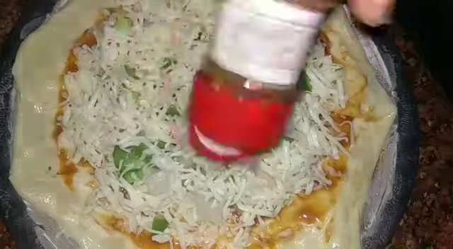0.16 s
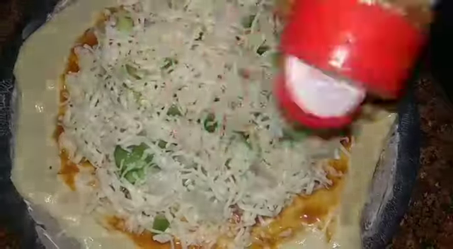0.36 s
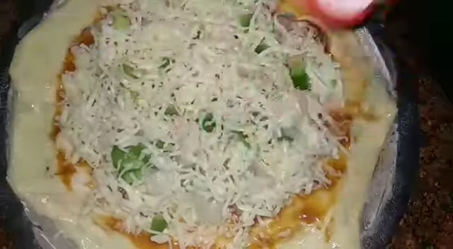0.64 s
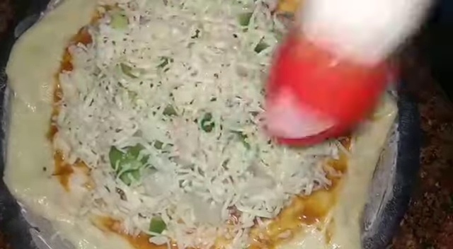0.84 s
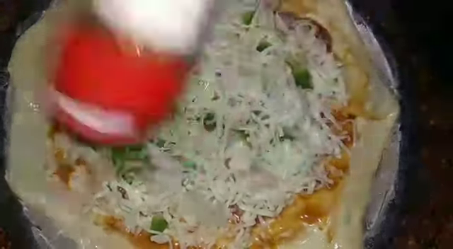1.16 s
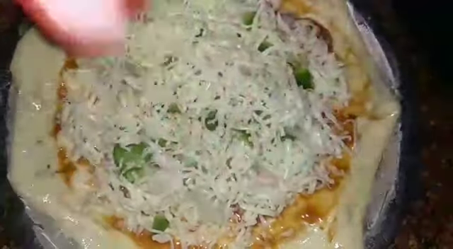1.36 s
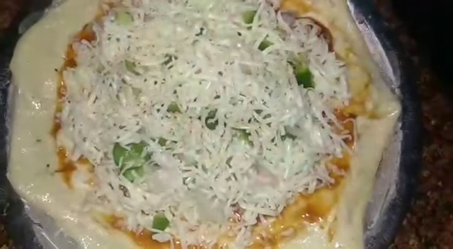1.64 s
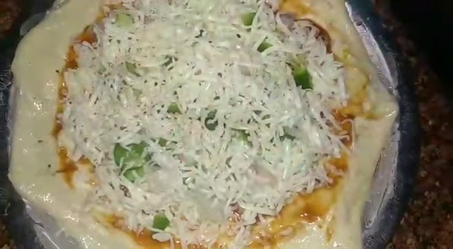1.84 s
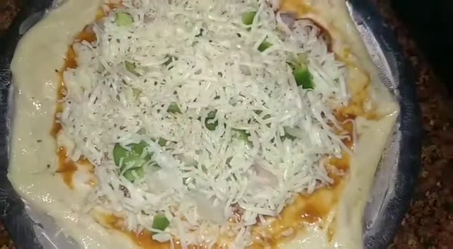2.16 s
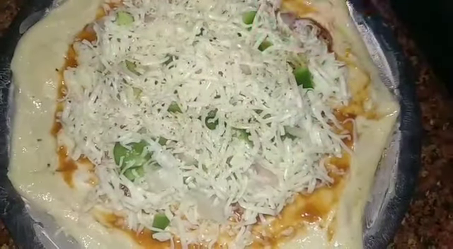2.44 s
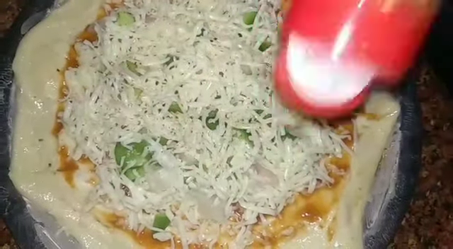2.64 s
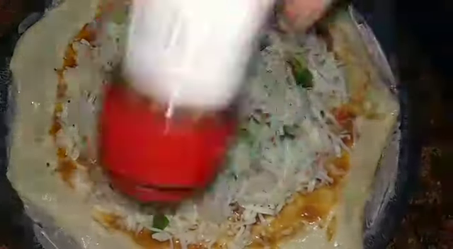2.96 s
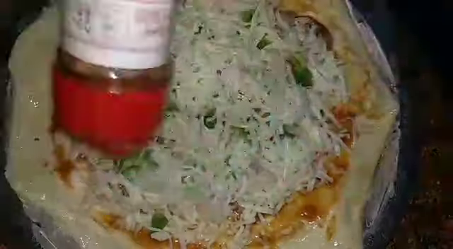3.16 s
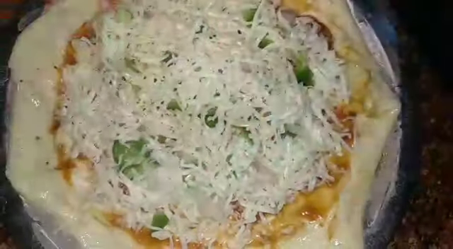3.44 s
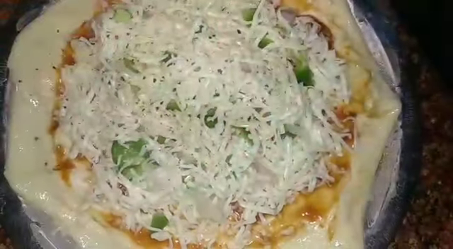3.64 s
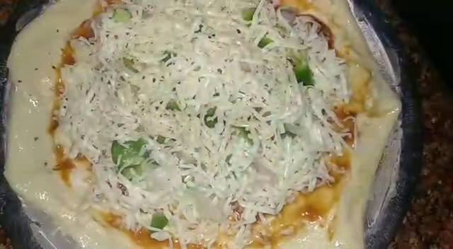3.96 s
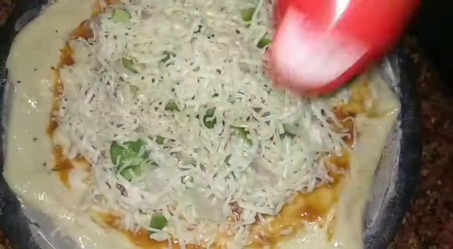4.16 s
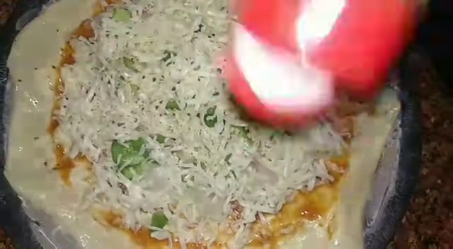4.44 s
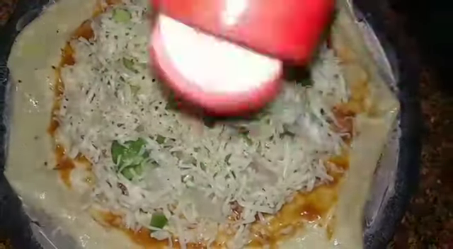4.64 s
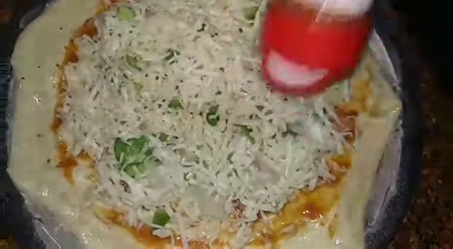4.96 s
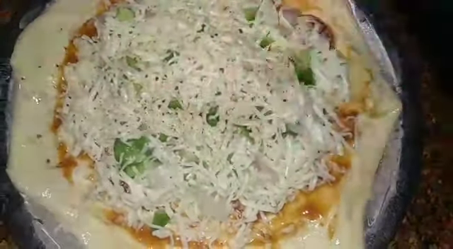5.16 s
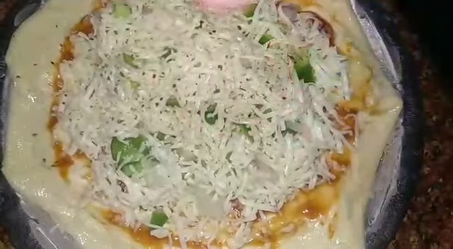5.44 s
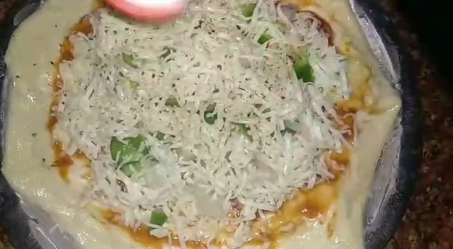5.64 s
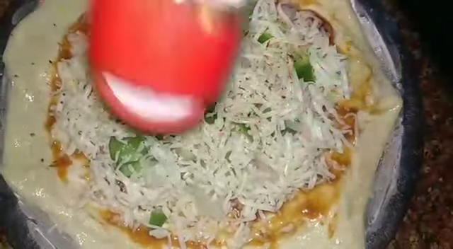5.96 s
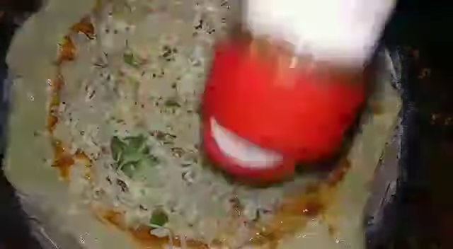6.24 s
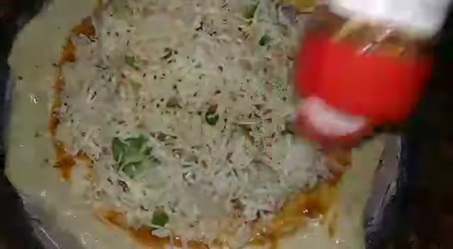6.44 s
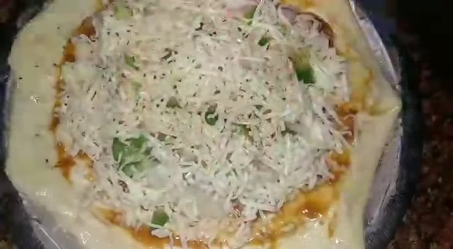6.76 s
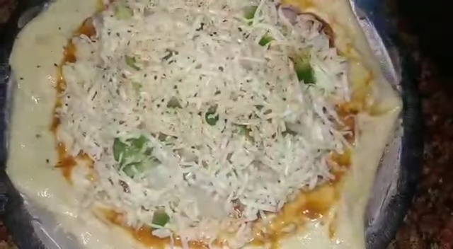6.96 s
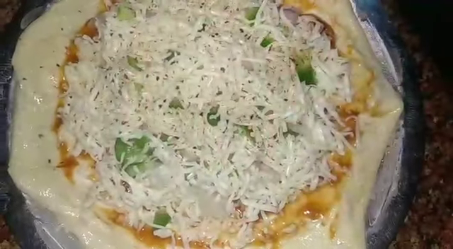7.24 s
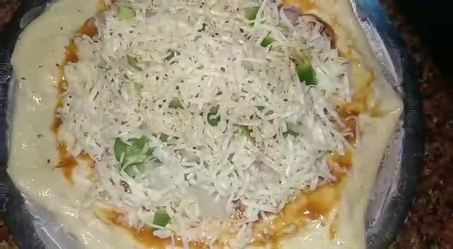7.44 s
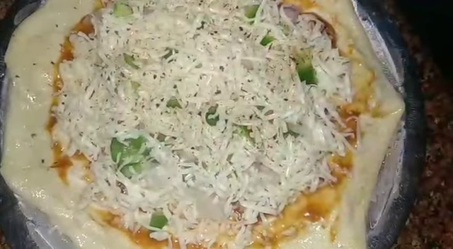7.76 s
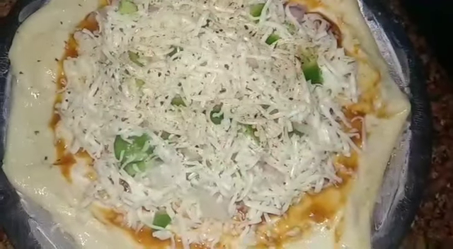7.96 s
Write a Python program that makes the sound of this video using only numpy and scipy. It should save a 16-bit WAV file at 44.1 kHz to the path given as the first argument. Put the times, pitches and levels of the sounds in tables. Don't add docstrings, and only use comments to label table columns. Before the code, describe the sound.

Dry flakes rattle in a small plastic jar shaken rapidly over food, with sharp seed cracks and slaps in a small hard kitchen.

```python
import sys
import numpy as np
from scipy import signal
from scipy.fft import rfft, irfft, next_fast_len
from scipy.io import wavfile
from scipy.ndimage import uniform_filter1d

SR = 44100
rng = np.random.default_rng(int(sys.argv[2]) if len(sys.argv) > 2 else 0)


def inscribe(sig):
    pcm = np.round(np.clip(np.atleast_2d(sig).T, -1, 1) * 32767)
    wavfile.write(sys.argv[1], SR, pcm.astype(np.int16))


def gain_from_db(level_db):
    decades = np.asarray(level_db, float) / 20
    return 10 ** decades


N = 357077


def rms_one(x):
    return x / np.sqrt(np.mean(x ** 2) + 1e-20)


def at_hz(points, hz):
    points = np.array(points)
    return np.interp(np.log(hz), np.log(points[:, 0]), points[:, 1])


def in_time(s, values):
    return np.interp(np.arange(N) / SR, s, values)


def colour(x, gains_db):
    size = next_fast_len(N + 4096)
    hz = np.maximum(np.arange(size // 2 + 1) * SR / size, 10)
    return irfft(rfft(x, size) * gain_from_db(gains_db(hz)), size)[..., :N]


def drift(rate_hz):
    r = np.exp(-2 * np.pi * rate_hz / SR)
    noise = rng.standard_normal(N + SR)
    return rms_one(signal.lfilter([1], [1, -2 * r, r * r], noise)[SR:])


def held_gains(count, spread_db):
    gains = gain_from_db(rng.normal(0, spread_db, (count, 2, N // 1024 + 1)))
    return np.repeat(gains, 1024, axis=2)[..., :N]


def left_right(difference_db):
    return np.outer([.5, -.5], difference_db)


def butter(x, order, hz, kind):
    return signal.sosfilt(signal.butter(order, hz, kind, fs=SR, output="sos"), x)


def resonance(x, hz, width_hz):
    r = np.exp(-np.pi * width_hz / SR)
    poles = [1, -2 * r * np.cos(2 * np.pi * hz / SR), r * r]
    return signal.lfilter([(1 - r * r) / 2, 0, (r * r - 1) / 2], poles, x)


def ring(clicks, hz, t60_s):
    r, w = gain_from_db(-60 / (t60_s * SR)), 2 * np.pi * hz / SR
    return signal.lfilter([0, np.sin(w)], [1, -2 * r * np.cos(w), r * r], clicks + 1e-18)


def landings():
    # start_s, lid_peak_db, base_delay_ms,
    # base_peak_db, spread_ms_per_10db
    jar_shakes = [(0.007, -28, 40, -27.5, 34), (0.126, -28, 50, -23.5, 16.5), (0.265, -30.5, 48, -21, 33.5),
                  (0.409, -22.5, 45, -22.5, 23.5), (0.55, -26, 36, -25.5, 35),
                  (0.683, -26.5, 47, -22, 24.5), (0.833, -25.5, 35, -21.5, 20.5),
                  (0.979, -19.5, 45, -22.5, 22.5), (1.264, -24.5, 31, -28.5, 36), (1.381, -23, 37, -21, 29),
                  (1.515, -16.5, 45, -19.5, 18.5), (1.67, -17.5, 42, -17, 15),
                  (1.815, -16, 48, -18.5, 14.5), (1.969, -18.5, 38.7, -17, 21.5),
                  (2.104, -22, 38.6, -22, 17),
                  (2.371, -16.5, 32, -18, 19.5), (2.643, -13.5, 47, -16.5, 14),
                   (2.903, -13, 38, -15, 13.5), (3.103, -17, 40, -26, 16.5), (3.268, -16.5, 43, -17, 14),
                   (3.445, -15.5, 46, -15.5, 11.5), (3.605, -14, 50, -23, 13.5),
                   (3.783, -16, 51, -17, 15.5), (3.964, -18, 62.4, -15.5, 18),
                   (4.138, -16.5, 54, -20.5, 19.5), (4.302, -16.5, 52, -16, 14.5),
                   (4.477, -19.5, 36, -18, 16), (4.655, -21, 35, -17, 22.5), (4.809, -25, 43.5, -20.5, 23),
                  (5.04, -22, 45, -23, 34), (5.203, -29, 36, -26.5, 29.5), (5.357, -25.5, 44.5, -21.5, 33),
                  (5.548, -25.5, 68.6, -20.5, 34), (5.707, -35, 40, -35.5, 20), (5.91, -26.5, 42, -21, 36),
                  (6.07, -24.5, 47, -24, 26.5), (6.262, -33.5, 53, -24, 25.5), (6.44, -38, 51, -27.5, 44),
                  (6.62, -33.5, 44, -30.5, 38), (6.818, -26, 28, -20, 26.5), (6.972, -26, 36, -25, 50),
                  (7.113, -27.5, 34, -22, 23), (7.253, -20, 50, -19.5, 19), (7.443, -31.5, 47, -28, 40),
                  (7.532, -26.5, 91, -34.5, 29.5), (7.683, -34, 42, -37, 52.5)]
    # start_s, peak_db, spread_ms_per_10db
    slides = [(0.94, -33.5, 25), (1.04, -26.5, 6), (1.124, -33.5, 33), (1.23, -32, 12), (1.33, -32, 7),
              (1.59, -32.5, 30), (1.745, -32, 30), (1.9, -35, 30), (2.045, -33, 25), (6.235, -35, 17),
              (6.35, -39, 20), (7.82, -47.5, 59.5), (4.157, -21, 11.5), (2.44, -63.5, 34),
              (2.806, -39.5, 28), (3.22, -38.5, 22), (3.415, -28.5, 29), (3.514, -24, 3), (4.767, -29, 0),
              (4.935, -28.5, 18), (5.006, -26, 6), (5.07, -25, 26.5), (5.162, -37, 1), (5.281, -34, 16),
              (5.772, -40, 1), (5.822, -27, 9), (6.772, -31, -35), (7.215, -37, 24), (7.405, -35, 40),
              (7.574, -35, 40), (7.75, -41.5, 54), (8.03, -60, 37), (8.09, -46, 20)]
    # start_s, peak_db, scatter_ms_per_10db
    slaps = [(0.1494, -17.5, 8), (0.7283, -16, 4), (0.8713, -8.5, 10), (1.0104, -17, 13.5), (1.509, -12, 7),
             (1.5507, -9, 1), (1.662, -19, 7), (1.806, -11, 12), (1.8517, -9.5, 9.5), (2.1033, -13, 11),
             (2.6364, -11.5, 14), (2.687, -7, 7), (3.0953, -10, -1), (3.14, -4, 12.5), (3.3119, -9, 18),
             (3.486, -8, 5.5), (3.599, -11, -2), (3.6566, -9.5, 6), (3.8333, -5, 3.5), (3.958, -17, 7),
             (4.0182, -9.5, 9), (4.1105, -12.5, 9.5), (4.187, -4, 11), (4.4615, -13.5, 7),
             (4.635, -11.5, 9), (4.679, -21, 6), (5.344, -8.5, 24), (5.787, -19.5, 13), (5.8182, -16, 9),
             (6.2976, -23, 6), (6.4363, -19, 17), (6.8014, -15, -1), (7.137, -13, 8), (7.207, -21, 7),
             (7.4774, -18, 5)]
    on_lid, on_base, in_slide, in_slap = (1.21, 0.8, -15), (0.85, 0.81, -16), (0.54, 0.84, -14), (0, 1, -16)
    shakes = jar_shakes
    hits = [(s, db, ms, on_lid) for s, db, _, _, ms in shakes]
    hits += [(s + delay_ms / 1000, db, ms, on_base) for s, _, delay_ms, db, ms in shakes]
    hits += [(s, db, ms, in_slide) for s, db, ms in slides]
    hits += [(s, db - 8.5, ms, in_slap) for s, db, ms in slaps]
    return sorted((s, db, gather * ms, settle * ms, wall_db)
                  for s, db, ms, (gather, settle, wall_db) in hits)


def swarm_strength(roundness):
    power, t_ms = np.full(N, 1e-9), np.arange(N) / SR * 1000
    for s, peak_db, gather_ms, settle_ms, _ in landings():
        near = slice(max(int((s - .25) * SR), 0), int((s + .25) * SR))
        late_ms = t_ms[near] - s * 1000
        gathering, settling = -late_ms / max(gather_ms, 2.6), late_ms / max(settle_ms, 2)
        steps = np.where(late_ms < 0, gathering, settling)
        power[near] += gain_from_db(peak_db - 1.5 - 10 * steps ** roundness) ** 2
    return np.sqrt(power)


def flakes(quiet_per_s, extra_per_s, spread_db, cycles, wall_db):
    # time_s, left_right_db
    sweep = [
        (0.0, -4),
        (0.99, -1),
        (1.1, -5),
        (2.55, -0.5),
        (3.25, -4.5),
        (4.28, 0.5),
        (4.58, -2),
        (7.47, -4.5),
        (8.1, 3),
    ]
    # freq_hz, level_db_per_hz
    flake_spectrum = [(1760, -106), (3000, -13.5), (3860, -7), (5520, -3.5), (6860, -3.5), (10400, 0),
                      (12200, -2), (14000, -6), (15200, -11), (15750, -20), (16500, -51)]
    # freq_hz, left_right_db
    flake_sides = [(60, -1.0), (180, -0.5), (550, 25), (1650, -5.5), (4970, -3.5), (15000, -12.5)]
    # freq_hz, width_hz, level_db
    wall_modes = [(1205, 317, -6.5), (2095, 333, -4), (2323, 130, -0.5), (2687, 255, 1), (3068, 255, -1.5),
                  (3360, 173, -1.5)]
    s, _, _, _, share_db = np.transpose(landings())
    strength = swarm_strength(roundness=1.146)
    density_per_s = quiet_per_s + extra_per_s * strength / strength.max()
    per_s = density_per_s * gain_from_db(1.8 * drift(90))
    sizes = gain_from_db(spread_db * np.minimum(rng.exponential(1, N), 5.5)) * (rng.random(N) < per_s / SR)
    sizes = rms_one(sizes / np.sqrt(density_per_s))
    hits = sizes * rng.choice([-1, 1], (2, N)) * gain_from_db(rng.normal(0, 0.77, (2, N)))

    pitches_hz, dealt = np.geomspace(3200, 15500, 12), rng.integers(0, 12, (2, N))
    patch = held_gains(12, spread_db=2.27)
    tick_sound = sum(ring(hits * patch[k] * (dealt == k), hz, cycles / hz) * hz
                     for k, hz in enumerate(pitches_hz))
    flat_hz, flat_power = signal.welch(tick_sound, SR, nperseg=128)
    even = np.transpose([flat_hz[1:], -10 * np.log10(flat_power.mean(axis=0)[1:])])
    tick_sound = rms_one(colour(tick_sound, lambda hz: at_hz(flake_spectrum, hz) + at_hz(even, hz)))

    grip = held_gains(len(wall_modes), spread_db=4.2)
    wall = sum((-1) ** k * gain_from_db(db) * resonance(hits * grip[k], hz, width_hz)
               for k, (hz, width_hz, db) in enumerate(wall_modes))
    wall = rms_one(butter(wall, 2, [950, 4200], "band"))

    rattle = strength * (tick_sound + gain_from_db(in_time(s, share_db) + wall_db) * wall)
    rattle = rattle * gain_from_db(left_right(in_time(*np.transpose(sweep)) + 5.7))
    return colour(rattle, lambda hz: left_right(at_hz(flake_sides, hz)))


def ticks(gain_db):
    # start_s, peak_db
    lone_clicks = [(1.2631, -13), (1.4205, -13), (1.5524, -9), (1.6601, -12), (3.5768, -15), (3.8322, -8),
                   (3.9574, -10), (4.1106, -18), (4.1864, -8), (4.4608, -14), (4.6334, -15), (4.7646, -13),
                   (4.799, -17), (5.1597, -23), (5.1996, -17), (5.3378, -13), (5.772, -17), (5.7745, -22),
                   (5.8575, -21), (6.2624, -22), (6.2976, -17), (6.4264, -23), (6.4363, -15), (6.4564, -24),
                   (6.4802, -20), (6.5141, -14), (6.6179, -22), (6.7685, -23), (6.8014, -17), (7.7159, -19),
                   (0.2299, -23), (0.3534, -18), (0.406, -15), (0.4234, -20), (0.5487, -15), (3.095, -10),
                    (5.344, -18), (7.2065, -20), (7.2314, -13), (7.2724, -17), (7.44, -25), (7.5144, -19),
                    (7.5714, -23), (7.7038, -20.5), (7.7444, -26)]
    events = lone_clicks
    taps, chance = np.zeros((2, N)), rng.random((len(events), 2, 4))
    for (s, peak_db), late in zip(events, chance):
        at = round(s * SR) + (late * [6, 40, 80, 130]).astype(int)
        taps[[[0], [1]], at] = gain_from_db(peak_db + gain_db - np.array([0, 5, 8, 11]))
    click = (ring(taps, 11500, .0012) + ring(taps, 7200, .0015)) * gain_from_db([[-2], [2]])
    return butter(click, 4, 4500, "high")


def seeds():
    # start_s, peak_db, pitch_hz
    seed_hits = [(1.558, -4, 6600), (1.6604, -17, 12500), (1.806, -10.5, 9800), (2.3452, -15, 9200),
                 (2.6351, 1.5, 7860), (2.8544, -15, 2900), (3.095, -4, 6170), (3.0997, -5, 6070),
                 (3.0976, -4, 8650), (3.141, -3, 5740), (3.415, -23, 9000), (3.579, -31, 8800),
                 (3.6531, -5.5, 5650), (3.833, -21, 6340), (3.959, 0.5, 10300), (4.111, -16, 4780),
                 (4.461, -18, 10000), (4.635, -24, 12800), (4.7626, -26, 6100), (5.3407, -4, 9900),
                 (5.3545, -2, 9500), (5.535, -9, 11300), (5.86, -20, 3180), (6.2997, -16, 6600),
                 (6.438, -22, 9250), (6.768, -20, 9800), (6.803, -17, 8400), (7.7159, -30, 12100)]
    out = np.zeros((2, N))
    for s, peak_db, hz in seed_hits:
        at = round(s * SR)
        late = (rng.random((2, 5)) * [8, 40, 80, 130, 190]).astype(int)
        tap = np.zeros((2, 600))
        tap[[[0], [1]], late] = gain_from_db(peak_db - 3.0 - np.array([0, 2.2, 3.5, 5, 7]))
        crack = ring(tap, 9550, 0.00072) + ring(tap, 5600, 0.001)
        out[:, at:at + 600] += 0.23 * crack + .5 * ring(tap, hz, 30.0 / hz)
    return butter(out, 2, 1900, "high") * gain_from_db([[-2], [2]])


def chinks():
    # start_s, peak_db
    touches = [
        (5.7848, -16.5),
        (5.8183, -14.5),
        (5.857, -31),
    ]
    # freq_hz, level_db, t60_s
    metal_modes = [(856, -15, 0.085), (774, -20.5, .05), (640, -26, .03), (2880, -4, 0.04),
                   (3180, -4, 0.099), (4300, -2.5, 0.021), (5780, -1.5, 0.081), (5420, -4, 0.028),
                   (8160, -5, 0.017), (9660, -9, 0.062), (10700, -15, 0.05), (14300, -9, .05),
                   (12400, -10, .03), (13400, -9, .045)]
    out = np.zeros((2, N))
    rebound_db = np.r_[0, np.full(6, 7.0)]
    for hz, level_db, t60_s in metal_modes:
        taps = np.zeros((2, N))
        for s, peak_db in touches:
            at = round(s * SR) + (rng.random(7) * np.arange(7) * 70).astype(int)
            tap_db = peak_db + level_db - 8.5 + rng.normal(0, 1.5, (2, 7)) - rebound_db
            taps[:, at] += gain_from_db(tap_db) * rng.choice([-1, 1], (2, 7))
        out += ring(taps, hz, t60_s)
    return out


def knocks():
    # start_s, peak_db, freq_hz, t60_s
    blows = [(4.882, -27.5, 222, 0.045), (5.041, -18.5, 350, 0.059), (5.488, -35.5, 325, 0.063),
             (5.799, -27.5, 247, 0.022), (5.833, -28.5, 232, 0.036), (6.155, -44, 166, 0.048),
             (6.189, -29.5, 335, 0.037), (6.363, -36, 198, 0.038), (6.4979, -31, 327, 0.047),
             (5.259, -38, 168, 0.045), (5.556, -34, 200, .03), (5.645, -41, 200, 0.027),
             (5.846, -37, 150, 0.037), (5.29, -35.5, 172, 0.072)]
    # time_s, level_db
    drag = [
        (4.87, -74),
        (4.9, -41.5),
        (4.96, -48.5),
        (5.02, -40),
        (5.05, -53.5),
        (6.5, -74.5),
        (6.7, -84),
    ]
    grit = rng.standard_normal(N)
    grumble = resonance(grit, 166, 63) + 0.3 * resonance(grit, 296, 190) + 0.05 * resonance(grit, 420, 150)
    out = gain_from_db(in_time(*np.transpose(drag))) * rms_one(grumble)
    push = np.hanning(round(.0012 * SR))
    for s, peak_db, hz, t60_s in blows:
        blow, at = np.zeros(N), round(s * SR)
        blow[at:at + len(push)] = gain_from_db(peak_db) * push / push.sum()
        out += ring(blow, hz, max(t60_s, .01))
        out += gain_from_db(-17) * ring(blow, 3.05 * hz, .012) - gain_from_db(-6) * ring(blow, 2.3 * hz, .012)
        out += gain_from_db(-7) * ring(blow, 0.65 * hz, 0.021) + gain_from_db(-8.5) * ring(blow, 1.7 * hz, .014)
        out -= gain_from_db(-2.0) * ring(blow, 1.45 * hz, 0.015)
    return butter(out, 2, 90, "high")


def room_noise():
    # freq_hz, level_db_per_hz
    air_spectrum = [(18, -57), (30, -27), (81, -2), (233, -1), (384, -8), (473, -4), (540, -9.5),
                    (913, -16.5), (1250, -22.5), (1630, -13.5), (2750, -17), (5590, -19), (12300, -22),
                    (16000, -44)]
    # freq_hz, left_right_likeness
    likeness = [(60, 0.48), (180, 0.78), (550, 0.015), (1650, -0.34), (4970, 0.28), (15000, 0.22)]
    # freq_hz, left_right_db
    air_sides = [(60, -3), (180, -2.5), (550, 3.5), (1650, 0), (4970, 5), (15000, -5)]
    # freq_hz, level_db_rms
    hum_tones = [(102.3, -52), (161.5, -65.5), (215, -65.5), (349.9, -62.5), (436.0, -62.5), (484.5, -57)]
    # time_s, level_db
    far_whir = [
        (0.0, -57),
        (2.68, -60.5),
        (4.24, -78),
        (4.8, -66),
        (8.1, -68),
    ]

    def alike(hz):
        return np.clip(at_hz(likeness, hz), -.9, .98)

    mid, side = rng.standard_normal((2, N))
    mid = colour(mid, lambda hz: at_hz(air_spectrum, hz) + 10 * np.log10(1 + alike(hz)))
    side = colour(side, lambda hz: at_hz(air_spectrum, hz) + 10 * np.log10(1 - alike(hz)))
    air = gain_from_db(-47.5) * rms_one(np.array([mid + side, mid - side]) * gain_from_db(2.3 * drift(6)))
    hum = np.zeros(N)
    for hz, db in hum_tones:
        waver_db, waver_phase_db = 1.5 * drift(8), 16 * drift(5)
        level = 10 ** ((db - 0.5 + waver_db) / 20)
        phase = waver_phase_db * np.log(10) / 20
        hum += 0
        hum += level * np.sin(2 * np.pi * hz * np.arange(N) / SR)
    whir = resonance(resonance(rng.standard_normal((2, N)), 923, 276), 923, 276)
    whir = gain_from_db(in_time(*np.transpose(far_whir)) + 7.5) * rms_one(whir)
    return colour(air + hum, lambda hz: left_right(at_hz(air_sides, hz))) + whir


def kitchen(x):
    t60_s, level_db, wall_cut_hz = 0.35, -7, 3900
    t = np.arange(int(.5 * SR)) / SR
    white = rng.standard_normal((2, 2, len(t))) * (t > .004)
    dull = butter(white, 2, wall_cut_hz, "low")
    tail = dull * gain_from_db(-60 * t / t60_s) + (white - dull) * gain_from_db(-60 * t / (0.93 * t60_s))
    tail = tail / np.sqrt(np.sum(tail ** 2, axis=-1, keepdims=True))
    place = 2.49 * drift(2.1)
    shares = np.array([np.cos(place), np.sin(place)])[:, None]
    return gain_from_db(level_db) * signal.oaconvolve(shares * x, tail, axes=-1)[..., :N].sum(axis=0)


def scene():
    near = flakes(4200, 9000, spread_db=1.0, cycles=8.7, wall_db=0.56)
    near = near + ticks(gain_db=0) + seeds() + chinks()
    return near + kitchen(near) + knocks() + room_noise()


def starve(x, usual_db, depth_db):
    # freq_hz, rarity_in_spreads, rarity_change_per_db
    starved_bands = [(300, 4.4, -.3), (480, 3.4, -.3), (580, .4, -.5), (700, -.6, -.55), (900, -.1, -.5),
                     (1150, 1.8, -.25), (1550, -.5, -.3), (1750, .3, -.2), (1950, 1.7, -.05),
                     (3000, 1.15, 0), (4000, .7, 0), (5700, 1.1, 0), (9000, 2.5, 0), (12500, 5.6, .2),
                     (13300, 3.6, .24), (14500, 3.4, .24), (15600, .6, .2)]
    hz, _, cells = signal.stft(x, SR, nperseg=1024)
    level_db = 10 * np.log10(np.sum(abs(cells) ** 2, axis=(0, 1)) + 1e-12) - usual_db
    level_db -= .3 * uniform_filter1d(level_db + 5, size=90)
    ahead_db = uniform_filter1d(level_db, size=7, origin=-1) + .5

    band = (30 * np.log(np.maximum(hz, 300) / 300)).astype(int)
    chance = rng.standard_normal((band.max() + 1, len(level_db)))
    chance = uniform_filter1d(uniform_filter1d(chance, size=4, axis=1), size=3, axis=0)
    chance = rms_one(chance)[band]

    table, hz = np.array(starved_bands), np.maximum(hz, 10)
    rarity = at_hz(table[:, :2], hz)[:, None] + np.outer(at_hz(table[:, ::2], hz), ahead_db)
    cell_db = 20 * np.log10(uniform_filter1d(abs(cells).mean(axis=0), size=9, axis=0) + 1e-9)
    low = (hz < 1100)[:, None]
    blow_db = cell_db - np.median(cell_db, axis=1, keepdims=True)
    rarity += np.clip(blow_db - 8, 0, 12) * 2 * low
    steady_db = uniform_filter1d(cell_db, size=120, axis=1) - cell_db.mean(axis=1, keepdims=True)
    rarity += .35 * steady_db * low
    lost_db = depth_db * np.clip(8 * (chance - rarity), 0, 1)
    return signal.istft(cells * gain_from_db(-lost_db), SR, nperseg=1024)[1][:, :N]


def band_limit(x):
    return signal.sosfilt(signal.butter(12, 15850, fs=SR, output="sos"), x)


def record(dry):
    starved = starve(.7 * np.tanh(dry / .7), usual_db=-27, depth_db=60)
    cut = signal.sosfilt(signal.ellip(10, .5, 70, 16000, fs=SR, output="sos"), starved)
    return band_limit(cut)


dry = scene()
out = record(dry)
inscribe(out)
```